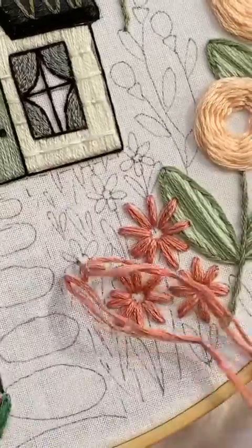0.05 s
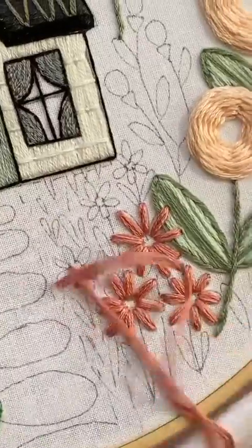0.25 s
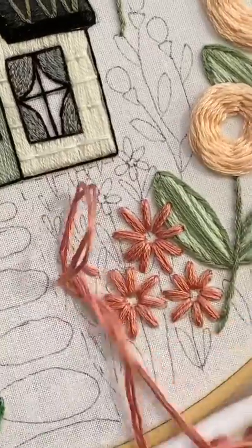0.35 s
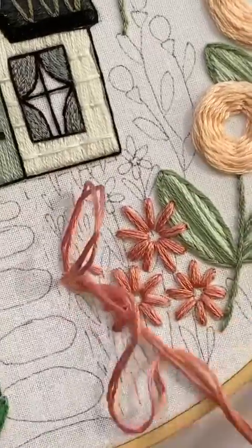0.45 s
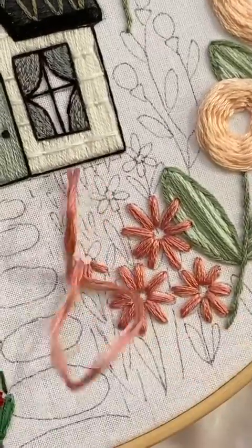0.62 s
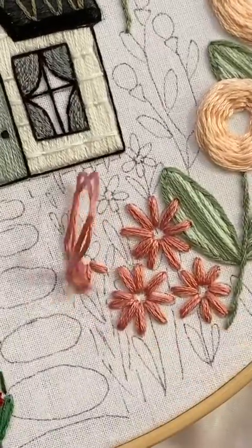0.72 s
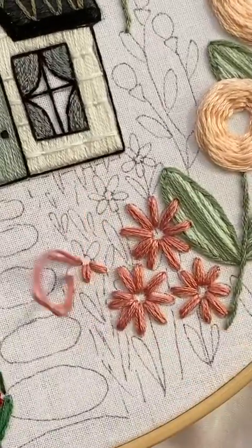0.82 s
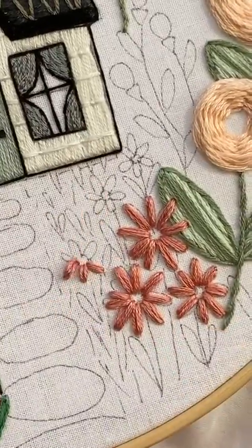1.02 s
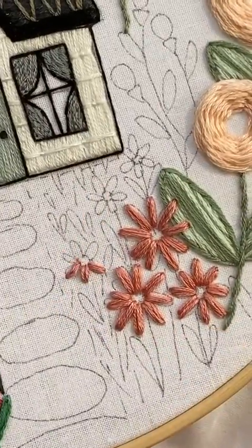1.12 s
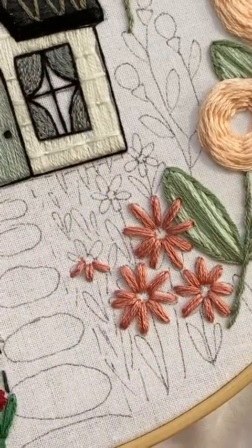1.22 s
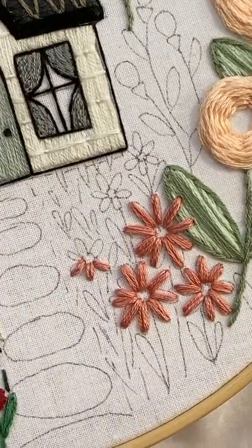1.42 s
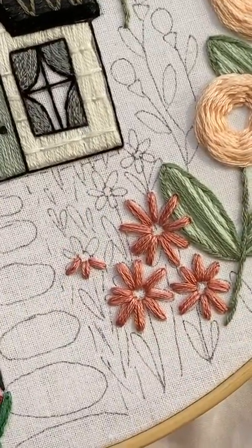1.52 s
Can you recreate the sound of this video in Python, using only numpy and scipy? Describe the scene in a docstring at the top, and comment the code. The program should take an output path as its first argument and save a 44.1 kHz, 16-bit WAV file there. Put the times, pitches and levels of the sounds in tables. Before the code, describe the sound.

A needle pops through taut hooped cloth: near-quiet, a small tap at 0.2 s, then immediately one loud, sharp crack with a short hollow drum ring at 0.22. From about 0.25 to 0.75 s thick thread pulls through, a much softer, bumpy low rumble with faint fibre hiss. It weakens with small bumps until 1.0; faint taps near 1.09 and 1.34 s. Fixed close mono microphone, quiet room hush.

```python
"""A needle pops through taut cloth in a wooden hoop, then thick cotton thread is pulled after it.
The cloth is a small drum: each tap is a short push that sets off a falling sweep and ringing modes, plus a crack.
Tiny slips of the thread drum on the same modes, its fibres hiss on the weave, and the two lowest modes sway.
Place: a quiet room, shaped noise with a faint high buzz of ticks. Distance: one fixed position, no movement.
Microphone: one channel, with the lowest bass and highest treble cut."""
import sys
import numpy as np
from scipy import signal
from scipy.fft import rfft, irfft
from scipy.io import wavfile
from scipy.ndimage import uniform_filter1d

SR = 44100
rng = np.random.default_rng(int(sys.argv[2]) if len(sys.argv) > 2 else 0)


def nominal_scale(level):
    """Amplitude ratio for a level in decibels (scalar or array-like)."""
    x = np.asarray(level, float) / 20
    return 10 ** x


def bounce(signal):
    """Save signal as a 16-bit WAV file at the path given by the first command-line argument."""
    frames = np.transpose(np.atleast_2d(signal))
    limited = np.clip(frames, -1, 1)
    pcm = np.round(limited * 32767).astype(np.int16)
    wavfile.write(sys.argv[1], SR, pcm)


N = 68355  # length in samples

# needle and finger taps: time_s (middle of the push), level_db, contact_ms,
# crack_db (peak, relative to level_db), crack_tilt_db_per_octave
NEEDLE_TAPS = [(.066, -43, .3, -26, -2), (0.1834, -35.5, 0.18, -3, 10), (0.2018, -15.5, 1.7, -74, -1.5),
               (.2193, -2, 0.041, -14, 2), (.845, -44.5, 0.22, -35, 2), (1.086, -54, .12, -13, 2),
               (1.335, -39, 0.22, -16, 8)]
# ringing modes of cloth and hoop: pitch_hz, level_db (relative), t60_s
DRUM_MODES = [(59, -22, 0.64), (98.4, -9.5, 0.14), (163.3, -15.5, 0.16), (190.9, -22, 0.36),
              (261.6, -20.5, 0.17), (292.5, -18, .12), (341.4, -21, 0.26), (410.7, -11.5, 0.064),
              (489.4, -21.5, 0.1), (598.5, -22.5, 0.21), (733, -36.5, 0.36), (821.5, -18.5, 0.04),
              (1120, -36, 0.097), (1150, -42, .06), (1750, -55, 0.09), (1930, -57, 0.033), (2587, -54, .05)]
# spectrum of the needle's crack before each tap's tilt: frequency_hz, level_db_per_hz (relative)
CRACK_SPECTRUM = [(900, -14.5), (1400, -15), (1700, 4), (2500, 4), (3150, -16.5), (3700, -9.5),
                  (4300, -8.5), (4700, -14), (5000, -8.5), (6000, -27.5), (6500, -18.5), (8500, -22.5),
                  (9600, -31.5), (13800, -36.5), (16000, -31)]
# thread and fingers on the cloth over time: time_s, drumming_db, hiss_db, sway_db
THREAD_PULL = [(0, -64, -78, -76), (0.048, -68, -72, -64), (0.078, -53.5, -62.5, -46.5),
               (0.124, -65, -70, -50), (0.162, -64.5, -74, -69), (0.217, -53.5, -64, -43),
               (.235, -37, -55.5, -70), (.28, -31.5, -52, -34), (0.341, -34, -56, -43),
               (.38, -40.5, -54.5, -40.5), (.46, -35, -53.5, -42), (.49, -40.5, -53, -61),
               (0.527, -35, -51, -39.5), (.6, -41.5, -54.5, -51), (.7, -43, -57.5, -50.5),
               (.765, -45.5, -63, -55), (.8, -47.5, -59.5, -64), (.835, -50.5, -62, -42.5),
               (.85, -43, -59, -39), (0.873, -50.5, -62, -67), (0.926, -42, -57.5, -43),
               (0.942, -44.5, -65.5, -70), (.955, -48.5, -73, -62), (0.981, -52, -64.5, -49.5),
               (0.999, -52.5, -76, -52.5), (1.06, -68, -81, -60.5), (1.09, -56, -70.5, -64),
               (1.119, -64.5, -80, -61), (1.169, -76.5, -84, -66), (1.32, -72.5, -83, -66),
               (1.36, -57, -79, -60), (1.4, -72, -81, -58.5), (1.46, -77.5, -82, -70),
               (1.55, -70, -82, -73.5)]
# colour of the hiss as the thread starts, runs and slows: frequency_hz, level_db_per_hz (relative)
HISS_STARTING = [(760, -32.5), (1300, -0.5), (1440, -8.5), (1710, -8), (2320, -8.5), (2490, -5.5),
                 (3380, -8), (3960, -11), (5370, -10.5), (5780, -15.5), (6620, -9.5), (7430, -18.5),
                 (8340, -5.5), (8980, -10.5), (11400, -11.5), (12600, -20), (15000, -17.5), (16000, -19)]
HISS_RUNNING = [(760, -33), (1300, -2.5), (1340, -21), (1550, -9.5), (1690, 0), (1880, 0.5), (2170, -10.5),
                (2550, 1), (2920, -14), (4880, -11.5), (5260, -9.5), (5780, -14.5), (6690, -5.5),
                (8430, -7.5), (8890, -9), (9770, -7.5), (12700, -18), (14300, -7), (15000, -8.5),
                (16000, -10)]
HISS_SLOWING = [(760, -31), (1300, -10.5), (1460, -15.5), (1620, -0.5), (1920, 1.5), (2130, -5), (2470, -3),
                (3210, -14), (3840, -6.5), (4990, -10.5), (6760, -3), (7510, -14.5), (8890, -6),
                (12600, -20.5), (14700, -7.5), (16000, -21.5)]
# moment at which each of those three colours stands alone: time_s
HISS_STAGE_TIMES = [0.12, 0.54, .8]
# share of each of the two lowest drum modes in the sway: level_db (relative)
SWAY_SHARES = [-4, -1.5]
# spectrum of the room's hush: frequency_hz, level_db_per_hz (relative)
ROOM_SPECTRUM = [(18, -39.5), (30, -14.5), (165, -1), (287, -2.5), (913, -13.5), (1160, -14), (1590, -17),
                 (2010, -18.5), (2750, -19.5), (3310, -19), (4910, -22.5), (10200, -31.5), (13700, -24.5),
                 (16000, -41)]


def sweep():
    """The wave in the cloth arrives treble first: its pitch falls as turns / (t + lead_s)."""
    turns, lead_s, rise_s, end_s = 1.96, 0.00185, 0.0009, 0.0056
    t = np.arange(SR // 2) / SR
    shape = (1 - np.exp(-t / rise_s)) * np.exp(-(t / end_s) ** 4)
    return shape * np.sin(2 * np.pi * turns * np.log(1 + t / lead_s))


def ring(modes):
    """Drum modes that swell over part of a cycle, so the bass comes last, and die away."""
    rise_turns = 0.5
    t = np.arange(SR // 2) / SR
    out = np.zeros(len(t))
    for hz, db, t60 in modes:
        swell = 1 - np.exp(-(t * hz / rise_turns) ** 2)
        out += nominal_scale(db - 60 * t / t60) * swell * np.sin(2 * np.pi * hz * t)
    return out


def colour(x, points):
    """Shapes the spectrum of x by a table, interpolated over log frequency."""
    f, db = np.transpose(points)
    hz = np.fft.rfftfreq(len(x), 1 / SR)
    gain = nominal_scale(np.interp(np.log(hz + 1), np.log(f + 1), db))
    return irfft(rfft(x) * gain, len(x))


def add(mix, s, sound):
    """Mixes a sound in at time s, cut at the end of the mix."""
    part = mix[round(s * SR):][:len(sound)]
    part += sound[:len(part)]


def taps():
    """A push as long as the contact sets off sweep and ring; a crack with a faint echo marks the point."""
    crack_t60_s = 0.003
    echo_db, echo_t60_s = -30.5, 0.34  # the crack's echo in the room
    lead = 128  # samples kept ahead of the crack for its filter's pre-ringing
    t = np.arange(8192) / SR
    out = np.zeros(N)
    body = sweep() + ring(DRUM_MODES)
    fade = nominal_scale(-60 * t / crack_t60_s) + nominal_scale(echo_db - 60 * t / echo_t60_s)
    for s, level_db, contact_ms, crack_db, tilt_db in NEEDLE_TAPS:
        # Gaussian push, centred two contact times in
        push = np.exp(-0.5 * ((t[:256] * 1000 - 2 * contact_ms) / (contact_ms / 2)) ** 2)
        drum = signal.oaconvolve(body, push / push.sum())
        add(out, s - 2 * contact_ms / 1000, nominal_scale(level_db) * drum)

        grit = rng.choice([-1., 1.], len(t))
        tilted = [(hz, db + tilt_db * np.log2(hz)) for hz, db in CRACK_SPECTRUM]
        crack = np.roll(colour(fade * grit, tilted), lead)
        add(out, s - lead / SR, nominal_scale(level_db + crack_db) * crack / abs(crack).max())
    return out


def evened(x):
    """Scales x to rms 1."""
    return x / np.sqrt(np.mean(x ** 2) + 1e-20)


def clicks(per_s, spread_db):
    """Random clicks of either sign, their levels spread by chance."""
    hit = rng.random(N) < per_s / SR
    sign = rng.choice([-1., 1.], N)
    size = np.minimum(rng.exponential(1, N), 5)
    return hit * sign * nominal_scale(spread_db * size)


def pull(col):
    """Gain over time from one column of the thread's pull."""
    rows = np.array(THREAD_PULL)
    return nominal_scale(np.interp(np.arange(N) / SR, rows[:, 0], rows[:, col]))


def thread():
    """Slips of the thread drum on the upper modes, each with a weaker sweep."""
    slips = clicks(per_s=900, spread_db=-1)
    upper = ring(DRUM_MODES[2:]) + nominal_scale(-3.5) * sweep()
    return evened(signal.oaconvolve(slips, upper)[:N]) * pull(col=1)


def hiss():
    """Fibres scrape the weave: dense clicks whose colour drifts from stage to stage and in patches."""
    patch_db = 1
    t = np.arange(N) / SR
    fuzz = clicks(per_s=7000, spread_db=1.5)
    colours = [HISS_STARTING, HISS_RUNNING, HISS_SLOWING]
    scrape = np.zeros(N)
    for points, on in zip(colours, np.eye(len(HISS_STAGE_TIMES))):
        scrape += np.interp(t, HISS_STAGE_TIMES, on) * evened(colour(fuzz, points))

    z = signal.stft(scrape, nperseg=1024)[2]
    patches = rng.standard_normal(z.T.shape)
    patches = uniform_filter1d(patches, size=16, axis=0)  # smooth over time
    patches = uniform_filter1d(patches, size=5, axis=1)  # smooth over frequency
    z = z * nominal_scale(patch_db * evened(patches).T)
    return evened(signal.istft(z, nperseg=1024)[1][:N]) * pull(col=2)


def sway():
    """The two lowest modes sway, driven by noise, with a shorter ring than after a tap."""
    damping = 1.5
    steady = 0.5  # 0 = level wanders by chance, 1 = nearly even level
    out = np.zeros(N)
    for (hz, _, t60), db in zip(DRUM_MODES, SWAY_SHARES):
        mode = ring([(hz, 0, t60 / damping)])
        driven = signal.oaconvolve(rng.standard_normal(N), mode)[:N]
        swing = signal.hilbert(evened(driven))
        out += nominal_scale(db) * (swing / (abs(swing) + 0.067) ** steady).real
    return evened(out) * pull(col=3)


def room():
    """The room's steady hush: noise shaped by its spectrum."""
    return nominal_scale(-66) * evened(colour(rng.standard_normal(N), ROOM_SPECTRUM))


def buzz():
    """Faint uneven ticks in one high band, each a short wave under a Gaussian."""
    ticks_per_s, jitter = 95, 0.35  # jitter as a share of the tick spacing
    pitch_hz, width_hz = 13100, 1300
    spread_db, level_db = 3.0, -80.5
    at = (np.arange(200) + jitter * rng.standard_normal(200)) * SR / ticks_per_s
    train = np.zeros(3 * N)
    train[abs(at).astype(int)] = nominal_scale(spread_db * np.clip(rng.standard_normal(200), -2, 1))
    t = np.arange(-100, 100) / SR
    tick = np.exp(-0.5 * (np.pi * width_hz * t) ** 2) * np.cos(2 * np.pi * pitch_hz * t)
    return nominal_scale(level_db) * evened(np.convolve(train[:N], tick, "same"))


def scene():
    """Taps and thread over the room's hush and buzz, in one channel."""
    return (taps() + thread() + hiss() + sway() + room() + buzz())[None]


def low_pass(x):
    """Removes everything above the highest recorded frequency."""
    return signal.sosfilt(signal.butter(12, 16440, fs=SR, output="sos"), x)


def record(dry):
    """The microphone's band limits: a bass cut at 40 Hz and a treble cut at 15800 Hz."""
    low_cut = signal.butter(4, 40, "high", fs=SR, output="sos")
    high_cut = signal.firwin(511, 15800, window=("kaiser", 1), fs=SR)
    x = signal.sosfilt(low_cut, dry)
    x = signal.oaconvolve(x, high_cut[None], "same")
    return low_pass(x)


dry = scene()
out = record(dry)
bounce(out)
```